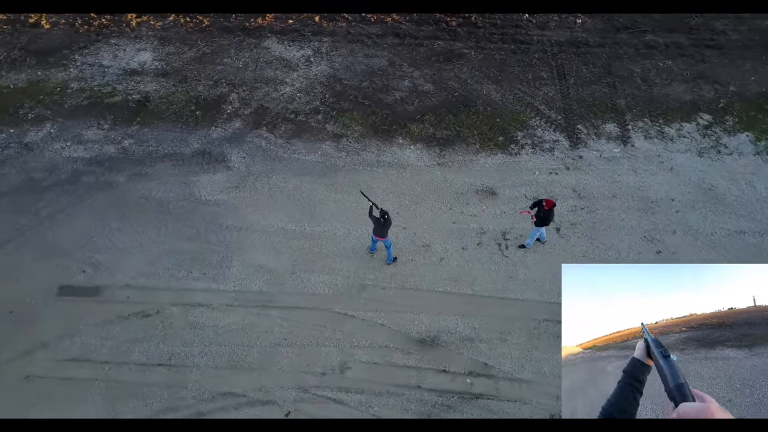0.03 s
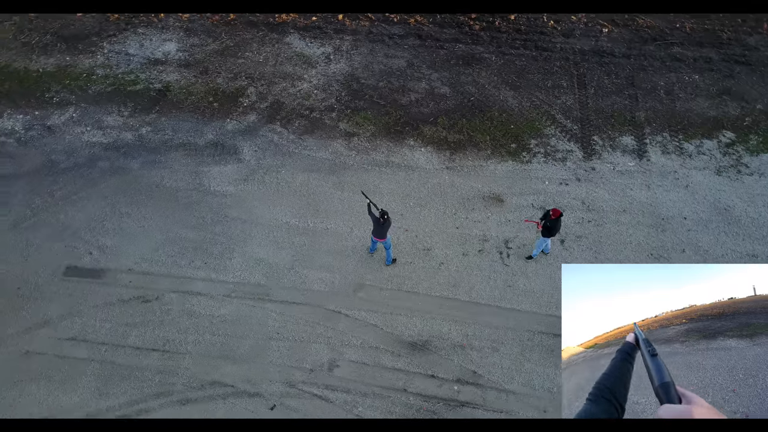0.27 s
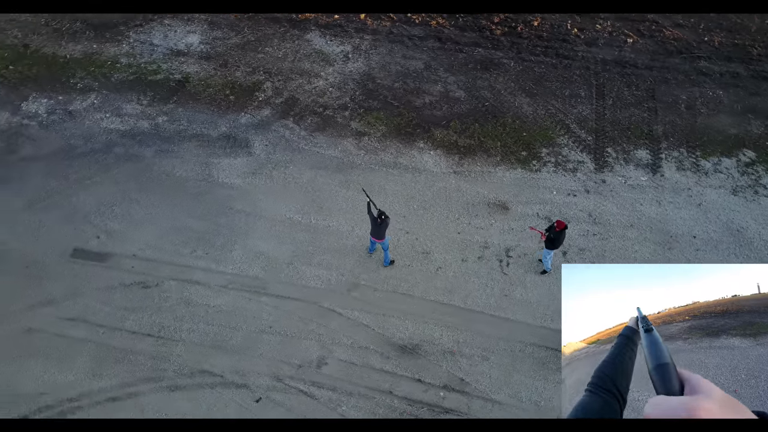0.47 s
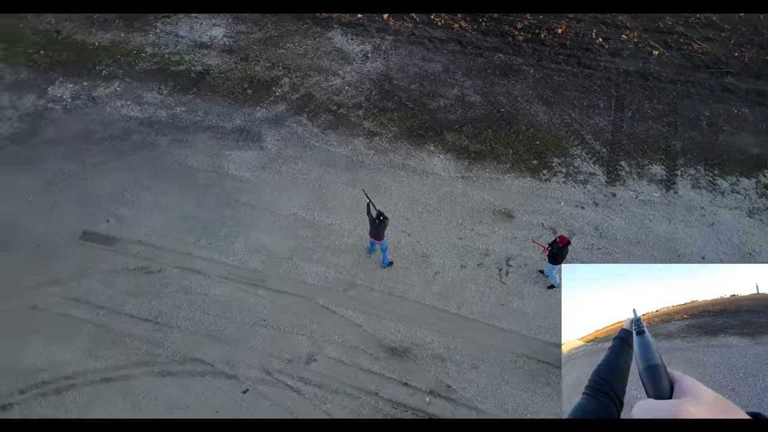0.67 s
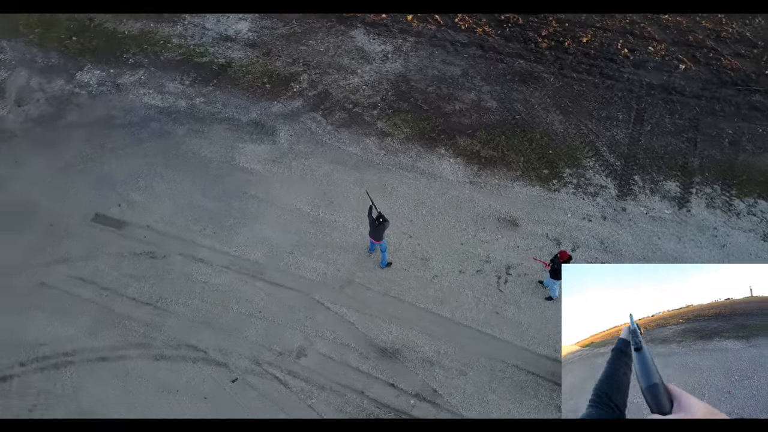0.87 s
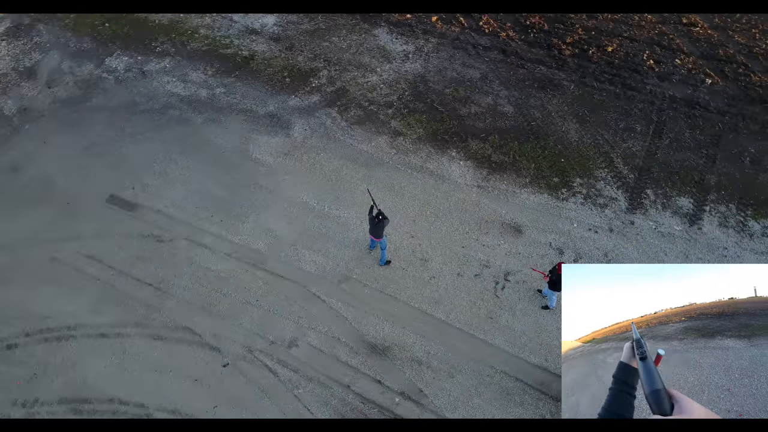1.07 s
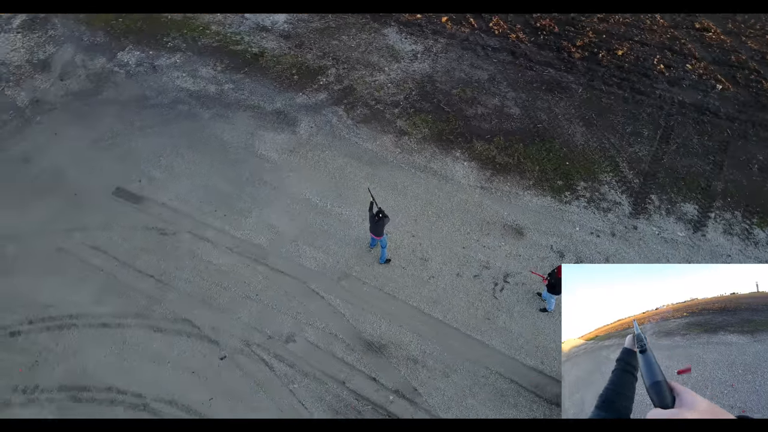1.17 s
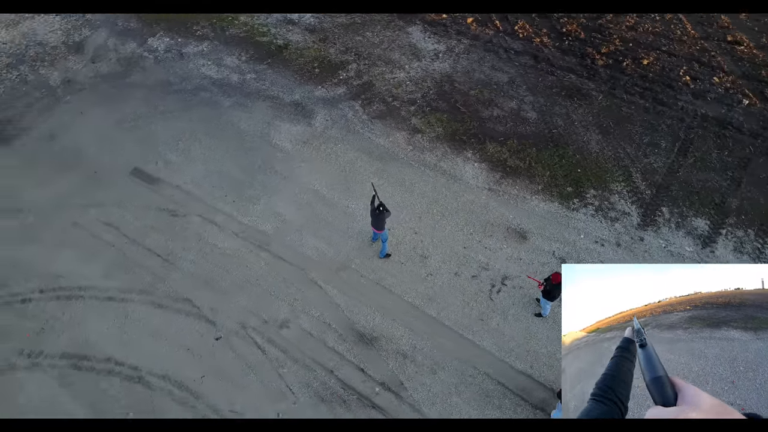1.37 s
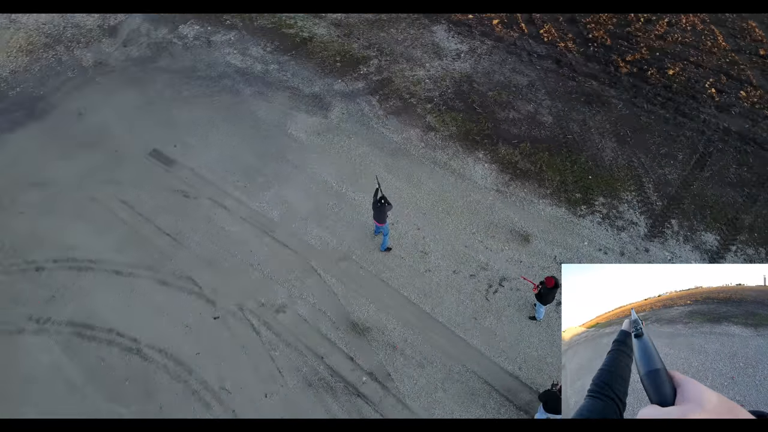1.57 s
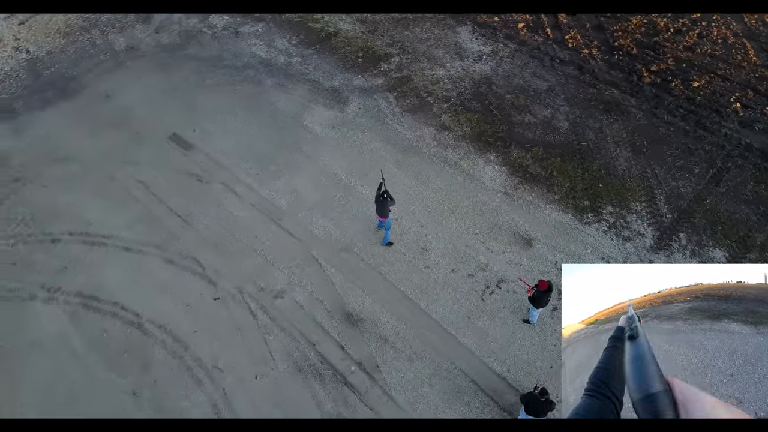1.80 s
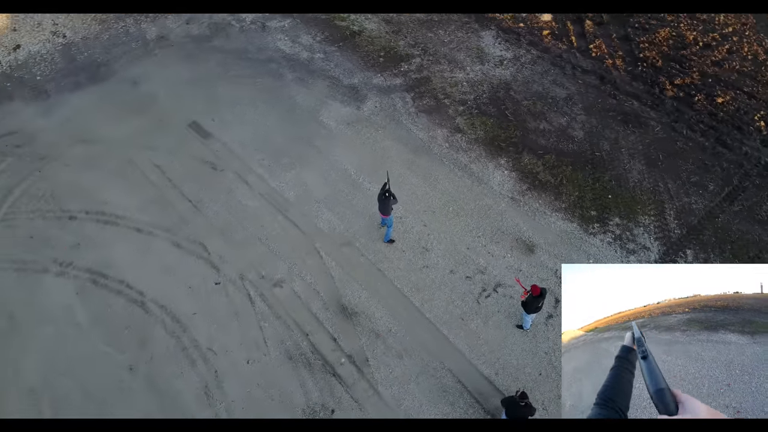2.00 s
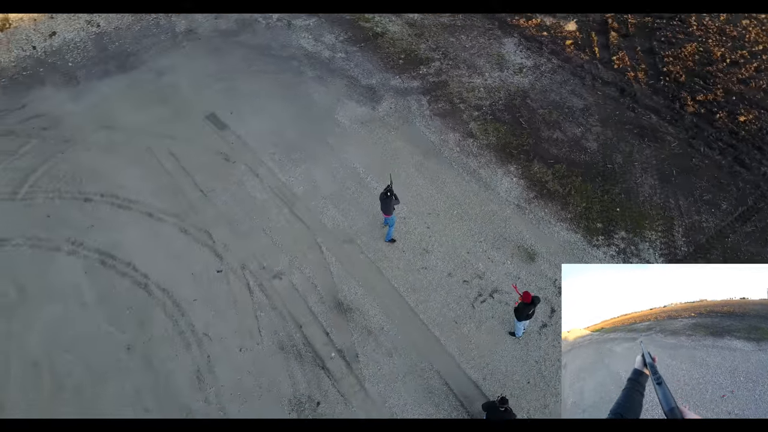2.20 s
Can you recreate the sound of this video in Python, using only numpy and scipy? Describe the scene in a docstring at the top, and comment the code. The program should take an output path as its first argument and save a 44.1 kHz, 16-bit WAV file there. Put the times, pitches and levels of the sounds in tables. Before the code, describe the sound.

A pump shotgun is racked with steel clacks and fired, then racked and fired again. Each blast overloads the microphone worn by the shooter and rolls away over open fields, with light wind bumps between the shots.

```python
"""Pump shotgun on an open range

Heard close, from the microphone of a camera worn by the shooter. The steel action is racked and a
shot cracks, slaps back off the ground and rolls away over the fields; then a second rack and shot.
The blasts overload the microphone, and wind bumps it in between."""
import sys
import numpy as np
from scipy import signal
from scipy.io import wavfile
from scipy.ndimage import uniform_filter1d

SR = 44100
rng = np.random.default_rng(int(sys.argv[2]) if len(sys.argv) > 2 else 0)


def transcribe(u):
    """Save the signal u as a 16-bit wav file named by the first command-line argument.

    u: samples, shape (n,) or (channels, n), limited to [-1, 1]; the rate is SR.
    q: integer samples, one column per channel.
    """
    v = np.clip(np.atleast_2d(u).T, -1, 1)
    q = np.round(v * 32767).astype(np.int16)
    wavfile.write(sys.argv[1], SR, q)


N = 99225


def amp(db):
    return 10 ** (np.asarray(db) / 20)


def unit(x):
    return x / np.sqrt(np.mean(x ** 2) + 1e-20)


def read(points, hz):
    """Straight lines on a log-frequency axis."""
    f, value = np.transpose(points)
    return np.interp(np.log(hz + 1), np.log(f + 1), value)


def level(points):
    """Gain over time from (time [s], level [dB]) points."""
    return amp(np.interp(np.arange(N) / SR, *np.transpose(points)))


def add(mix, s, sound):
    part = mix[max(round(s * SR), 0):][:len(sound)]
    part += sound[:len(part)]


def die_away(t, t60):
    return np.exp(-np.log(1000) * t / t60)


def colour(x, points, keep_power=True, size=4096):
    """Causal filter with the given spectrum; by default it keeps the power of white noise."""
    log_gain = np.log(amp(read(points, abs(np.fft.fftfreq(size, 1 / SR)))))
    taps = np.fft.ifft(np.exp(np.conj(signal.hilbert(log_gain)))).real[:size // 2]
    return signal.oaconvolve(x, taps / (np.linalg.norm(taps) if keep_power else 1))[:len(x)]


def chatter(size):
    """Dense tiny impacts of equal strength and random sign."""
    return rng.choice([-1., 1.], size)


def grains(per_s, spread_db):
    """Random clicks of uneven size, rms 1."""
    sizes = amp(spread_db * np.minimum(rng.exponential(1, N), 4))
    return unit(chatter(N) * sizes * (rng.random(N) < per_s / SR))


def wander(step_s, depth_db):
    """A gain that wanders at random."""
    t = np.arange(N) / SR
    steps = np.clip(rng.standard_normal(4000), -2, 2)
    return unit(amp(depth_db * np.interp(t / step_s, np.arange(len(steps)), steps)))


# wind on the microphone and open air around it: (time [s], level [dB])
WIND_LEVEL = [(0, -46.5), (.12, -86), (.27, -57), (.37, -60.5), (.46, -72), (.6, -61.5), (.7, -45),
              (.78, -48), (.9, -79.5), (1.1, -47.5), (1.38, -54), (1.42, -41), (1.48, -38), (1.56, -42),
              (1.65, -47), (1.76, -47), (1.83, -31), (1.87, -54.5), (2.25, -49.5)]
AIR_LEVEL = [(0, 7), (.55, 4), (1.6, -2), (2.25, -1)]
# their spectra: (frequency [Hz], gain [dB])
WIND_COLOUR = [(15, -11), (35, 1), (65, -4.5), (130, -5.5), (250, -16), (450, -25.5), (900, -43),
               (3000, -68.5)]
AIR_COLOUR = [(30, 11.5), (200, -3.5), (800, -5), (1600, -7.5), (3500, -20.5), (6500, -15.5), (9000, -24),
              (14000, -47)]


def wind():
    """Lumpy buffeting right on the microphone, over the quiet hiss of the open range."""
    gusts = unit(colour(grains(per_s=820, spread_db=2), WIND_COLOUR))
    air = amp(-63) * colour(rng.standard_normal(N), AIR_COLOUR)
    return level(WIND_LEVEL) * gusts + level(AIR_LEVEL) * air


# the slide rubbing back and forth: (time [s], level [dB])
SLIDE_LEVEL = [(0, -46), (.02, -45.5), (.045, -58.5), (.1, -75), (.13, -61.5), (.213, -50.5), (.245, -31),
               (.325, -33), (.345, -38), (.385, -57.5), (.41, -74.5), (.55, -82), (.58, -60), (.67, -76.5),
               (.97, -59.5), (1.0, -57), (1.05, -48), (1.075, -40), (1.105, -33.5), (1.16, -56.5),
               (1.21, -47), (1.235, -35), (1.315, -34.5), (1.345, -71), (1.39, -83.5), (1.97, -70.5),
               (2.005, -50), (2.05, -61), (2.25, -66.5)]
# steel knocks: (time [s], level [dB], decay [s], stock relative to knock [dB])
KNOCKS = [(.182, -33.5, 0.0026, -8), (0.2001, -33, 0.0038, -10), (0.2239, -30.5, 0.006, -10),
          (.235, -25.5, 0.013, -9), (0.2542, -11.5, 0.0016, -13), (0.256, -16.5, 0.006, -39),
          (0.2768, -24, 0.0038, -29), (0.2867, -20.5, 0.005, -29), (0.2974, -23.5, 0.01, -26),
          (0.3139, -17.5, 0.0026, -0.5), (0.318, -11, 0.0043, -15.5), (0.3254, -8.5, 0.0037, -18.5),
          (0.3459, -27.5, 0.0024, -12), (0.361, -30, 0.0016, -16), (.38, -44.5, 0.0019, -7),
          (.555, -54.5, 0.0037, -17.5), (.586, -52, 0.003, 4), (0.6265, -34, 0.0042, -8),
          (0.8124, -22, 0.001, 7.5), (0.825, -31, 0.0075, -13.5), (0.9087, -33, 0.0027, -3),
          (0.9186, -31, 0.0054, -9), (0.99, -39, 0.0016, -11), (0.9982, -38, 0.0026, -2),
          (1.013, -36, 0.0022, -21), (1.0296, -33.5, 0.0078, -7), (1.056, -23, 0.0059, -27),
          (1.066, -16, 0.0032, -5.5), (1.0681, -15.5, 0.0029, -29), (1.0866, -18, 0.0012, -21),
          (1.094, -16, 0.0032, -20), (1.1201, -34.5, 0.0066, -16), (1.132, -33, 0.0082, -9),
          (1.141, -29, 0.0015, -2), (1.1802, -34.5, 0.0018, -29), (1.19, -50, 0.0024, 9.5),
          (1.2205, -27.5, 0.0051, -2), (1.233, -25, 0.0026, -29), (1.2364, -23.5, 0.0024, -32),
          (1.246, -27, 0.0013, -16.5), (1.2562, -25.5, 0.0048, -30), (1.267, -18.5, 0.0026, -26),
          (1.2794, -23, 0.0038, -29), (1.299, -31.5, 0.013, -4), (1.304, -13, 0.0031, -11.5),
          (1.315, -13.5, 0.0032, -8.5), (1.646, -42, 0.0035, -7), (1.742, -51, 0.0042, -7.5),
          (1.8589, -41, 0.002, -4.5), (1.8947, -23.5, 0.006, -26), (1.992, -44, 0.0092, -0.5),
          (2.006, -34.5, 0.004, -30), (2.015, -32, 0.0058, -2.5), (2.0769, -49.5, 0.0071, -31),
          (2.173, -51.5, 0.0018, 0)]
# receiver resonances: (frequency [Hz], gain [dB], t60 before the cap [s])
RECEIVER_MODES = [(589, 0, 0.062), (900, 3.5, 0.09), (1954, 1.5, 0.069), (2090, -5, 0.043),
                  (2212, -4.5, 0.06), (2560, -1, .045), (3380, -8, 0.013), (4760, -4, 0.025),
                  (4920, -7.5, 0.037), (4930, -5, .05), (5710, -6, 0.051), (6680, -0.5, 0.11),
                  (6500, 5.5, 0.026), (6740, 1, 0.034)]
# spectra of steel and stock: (frequency [Hz], gain [dB])
STEEL_COLOUR = [(100, -37.5), (400, -17), (900, -15), (1500, -9), (2200, -2.5), (3000, -1), (4000, -2.5),
                (5000, 1.5), (6500, -1), (7500, -8), (9700, -15.5), (11000, -29.5), (14000, -37)]
STOCK_COLOUR = [(60, -19), (300, -5), (600, -0.5), (900, 4), (1400, 1), (2400, 8), (4000, -11.5),
                (12000, -49.5)]
STRIKE_S = 0.00062  # rise of a knock or ping


def action():
    """Close by, knocks and gritty sliding ring the steel receiver and the duller stock."""
    steel = level(SLIDE_LEVEL) * grains(per_s=3000, spread_db=2.5) * wander(step_s=0.0041, depth_db=5)
    stock = amp(-6.5) * steel
    t = np.arange(SR // 10) / SR
    for s, db, decay, stock_db in KNOCKS:
        knock = amp(db) * chatter(len(t)) * np.minimum(t / STRIKE_S, 1) * np.exp(-t / decay)
        add(steel, s, knock)
        add(stock, s, amp(stock_db) * knock)
    ring = np.zeros(N)
    for hz, db, t60 in RECEIVER_MODES:
        fade = die_away(t, min(t60, .06))
        mode = amp(db) * 2 * fade / fade.sum() * np.cos(2 * np.pi * hz * t)
        contact = wander(step_s=0.0079, depth_db=4.5)  # modes take turns as the contact moves
        ring += signal.oaconvolve(steel * contact, mode)[:N]
    return colour(steel + ring, STEEL_COLOUR) + colour(stock, STOCK_COLOUR)


# shell, lifter and latch: (time [s], frequency [Hz], level [dB], t60 [s])
PART_PINGS = [(.3175, 577.6, -25, 0.07), (0.3166, 891, -26.5, 0.07), (.318, 2290, -19, 0.056),
              (.6085, 926, -34.5, 0.019), (.629, 4540, -30.5, 0.0092), (1.068, 6430, -8.5, 0.014),
              (1.069, 1390, -26, 0.041), (1.095, 5440, -1.5, 0.0056), (1.095, 1155, -27, 0.049),
              (1.097, 1490, -30.5, 0.061), (1.304, 2226, -22.5, .035), (1.315, 2280, -18, 0.021),
              (1.315, 4410, -10, 0.012), (1.315, 3350, -23.5, 0.021), (1.374, 1053, -42, 0.039),
              (1.647, 1170, -42, 0.022), (1.647, 4200, -27.5, 0.0044), (1.8588, 4320, -37.5, 0.017),
              (2.138, 2910, -44.5, 0.026), (2.172, 1720, -42, 0.032), (2.199, 1096, -42.5, 0.051)]


def pings():
    """Small parts of the gun ring briefly as they are knocked into place."""
    t, out = np.arange(SR // 8) / SR, np.zeros(N)
    rise = np.minimum(t / STRIKE_S, 1)
    for s, hz, db, t60 in PART_PINGS:
        add(out, s, amp(db) * rise * die_away(t, t60) * np.sin(2 * np.pi * hz * t))
    return out


# eddies bumping the microphone: (time [s], level [dB], width [s])
EDDIES = [(.383, -42, .011), (0.695, -35, 0.0028), (0.76, -41, 0.0045), (1.447, -28.5, 0.0042),
          (1.479, -28, 0.0074), (1.501, -27.5, 0.0027), (1.514, -34.5, 0.0053), (1.565, -32.5, 0.0045),
          (1.736, -30.5, 0.0022), (1.753, -32, 0.0018), (1.773, -34, 0.0061), (1.813, -26, 0.0059),
          (1.8299, -25.5, 0.0019)]
# flutters in the gusts: (time [s], level [dB])
FLUTTERS = [(1.414, -39), (1.443, -37), (1.561, -41.5), (1.591, -42.5), (1.66, -41.5), (1.705, -47),
            (1.754, -41.5), (1.811, -44)]
# their spectrum: (frequency [Hz], gain [dB])
FLUTTER_COLOUR = [(60, -30), (200, -1.5), (320, 1.5), (450, -8), (650, -18), (1000, -25.5), (3000, -51.5)]


def wind_bumps(flutter_s=0.0048):
    """Each eddy at the microphone is a soft push between two suctions; some gusts flutter hollowly."""
    t, pushes, flutter = np.arange(N) / SR, np.zeros(N), np.zeros(N)
    for s, db, width in EDDIES:
        u = (t - s) / width
        pushes += amp(db) * (1 - u ** 2) * np.exp(-u ** 2 / 2)
    for s, db in FLUTTERS:
        flutter += amp(db) * np.exp(-((t - s) / flutter_s) ** 2)
    return pushes + colour(flutter * chatter(N), FLUTTER_COLOUR)


def hush(lead_s=0.0336, depth_db=-18):
    """The level dips briefly just before each shot."""
    t, dip = np.arange(N) / SR, np.zeros(N)
    for s, *_ in SHOTS:
        dip += (t > s - lead_s) & (t < s - .006)
    return amp(depth_db * uniform_filter1d(dip, size=200))


def shock(push_s):
    """A pressure jump that falls through zero into suction."""
    u = np.arange(SR // 20) / SR / push_s
    return (1 - u) * np.exp(-u)


# the two reports: (time [s], blast [dB], crack [dB], ring [dB], slap [dB], thump [dB], echo [dB])
SHOTS = [(0.8156, -1.5, -9.5, -12.5, 3, -21.5, -1), (1.8989, 0, -13.5, -12, 5, -26, 0.5)]
# ground slap after each: (delay [s])
SLAP_DELAYS = [.0078, .0073]
# spectra of blast, crack and ring: (frequency [Hz], gain [dB])
BLAST_COLOUR = [(30, -34.5), (110, 3.5), (300, 2.5), (800, -11.5), (1400, -2.5), (2400, -3.5), (3800, -8.5),
                (5500, -2.5), (8000, -9.5), (11000, -29), (15000, -56)]
CRACK_COLOUR = [(60, -6.5), (280, -5.5), (800, -5.5), (1300, -3), (1900, -6.5), (2500, -3.5), (2900, -7),
                (3800, -15.5), (6000, -25.5), (14000, -45)]
RING_COLOUR = [(100, -34.5), (3900, -23), (5200, -3), (6500, -1), (7500, -10), (8500, -8), (10500, -23),
               (14000, -39.5)]
# camera housing, rung by each shock: (frequency [Hz], level [dB], t60 [s])
HOUSING_MODES = [(2440, -16.5, .008), (5545, -3, 0.0046), (6500, -20, 0.0097)]


def shots(crack_hold_s=0.0016, crack_decay_s=0.0012, thump_hz=50.3, thump_s=0.0043, slap_rise_s=.00007):
    """A close muzzle shock with harsh crack, bright ring and low thump, then its slap off the ground."""
    t = np.arange(SR // 10) / SR
    shocks, cracks, rings, thumps, housing = np.zeros((5, N))
    burst = np.exp(-np.maximum(t - crack_hold_s, 0) / crack_decay_s)
    thump = np.sin(2 * np.pi * thump_hz * t) * np.exp(1 - t / thump_s)
    housing_ring = sum(amp(db) * die_away(t, t60) * np.sin(2 * np.pi * hz * t)
                       for hz, db, t60 in HOUSING_MODES)
    soften = np.exp(-t / slap_rise_s)
    slap = signal.oaconvolve(shock(push_s=0.00026), soften / soften.sum())
    for (s, blast_db, crack_db, ring_db, slap_db, thump_db, _), delay in zip(SHOTS, SLAP_DELAYS):
        add(shocks, s, amp(blast_db) * shock(push_s=0.00044))
        add(shocks, s + delay, amp(slap_db) * slap)
        add(housing, s, housing_ring)
        add(housing, s + delay, amp(-7.5) * housing_ring)
        add(cracks, s, amp(crack_db) * chatter(len(t)) * burst)
        add(rings, s, amp(ring_db) * chatter(len(t)) * burst)
        add(thumps, s, amp(thump_db) * thump)
    blasts = colour(shocks, BLAST_COLOUR, keep_power=False)
    return blasts + colour(cracks, CRACK_COLOUR) + colour(rings, RING_COLOUR) + thumps + housing


# echo rolling over the fields: (frequency [Hz], gain [dB], t60 [s])
FIELD_ECHO = [(30.2, -4.5, 1.3), (99.4, 2, 0.89), (295.5, 1.5, 2.2), (800, -6, 1.7), (2000, -11.5, 1.9),
              (3820, -8.5, 0.45), (5900, 2.5, 0.28), (9560, -9.5, 0.25), (13000, -48.5, .4)]
# single far echoes: (time [s], level [dB])
FAR_RETURNS = [(.839, -37), (0.955, -36), (0.993, -33), (1.374, -41.5), (2.038, -38), (2.075, -34.5),
               (2.17, -40)]
# their spectrum: (frequency [Hz], gain [dB])
RETURN_COLOUR = [(40, -5), (250, 4), (700, -1), (1500, -15), (3500, -18.5), (10000, -54.5)]


def echoes(return_decay_s=0.0065):
    """The fields scatter each report back, the treble dying first; a few distant returns stand out."""
    roll, far = np.zeros((2, N))
    spectrum = [(hz, db) for hz, db, _ in FIELD_ECHO]
    t60s = [(hz, t60) for hz, _, t60 in FIELD_ECHO]
    for s, *_, echo_db in SHOTS:
        scatter = grains(per_s=6200, spread_db=3) * wander(step_s=0.0083, depth_db=2.5)
        hz, t, bands = signal.stft(colour(scatter, spectrum), SR, nperseg=256)
        fade = amp(-60 * t / read(t60s, hz)[:, None])
        add(roll, s, amp(echo_db - 34.5) * signal.istft(bands * fade, SR)[1])
    t = np.arange(SR // 10) / SR
    for s, db in FAR_RETURNS:
        add(far, s, amp(db) * chatter(len(t)) * np.exp(-t / return_decay_s))
    return roll + colour(far, RETURN_COLOUR)


# spectrum of the snap: (frequency [Hz], gain [dB])
SNAP_COLOUR = [(100, -3), (700, 6.5), (2000, -7), (6000, -14.5), (14000, -31)]


def snap(at_s=1.8315):
    """A single dry snap close to the microphone."""
    click = np.zeros(N)
    add(click, at_s, [amp(-16.5)])
    return colour(click, SNAP_COLOUR)


def scene():
    """The range from the shooter's position, in mono."""
    reports = shots()
    surroundings = echoes() + action() + pings() + snap() + wind() + wind_bumps()
    return (reports + surroundings * hush())[None]


# microphone response: (frequency [Hz], gain [dB])
MIC_RESPONSE = [(20, 0.5), (8500, -1), (11000, -1), (14000, -6)]


def record(dry):
    """The blasts overload the camera's microphone; its treble rolls off up to a steep band limit."""
    ceiling, edge_hz = .9, 14400
    clipped = dry[0] / (1 + (dry[0] / ceiling) ** 12) ** (1 / 12)
    dulled = colour(clipped, MIC_RESPONSE, keep_power=False)
    band_limit = signal.firwin(255, edge_hz, window=("kaiser", 9), fs=SR)
    return signal.oaconvolve(dulled, band_limit, "same")[None]


dry = scene()
out = record(dry)
transcribe(out)
```